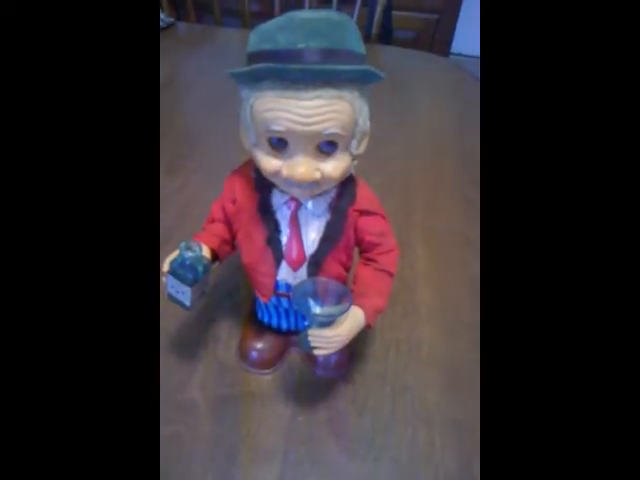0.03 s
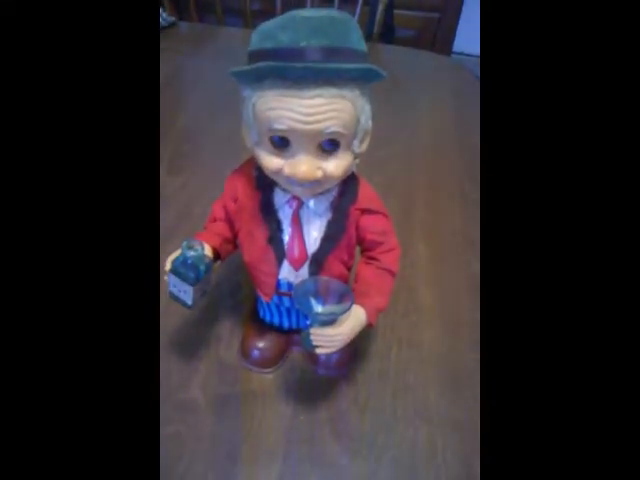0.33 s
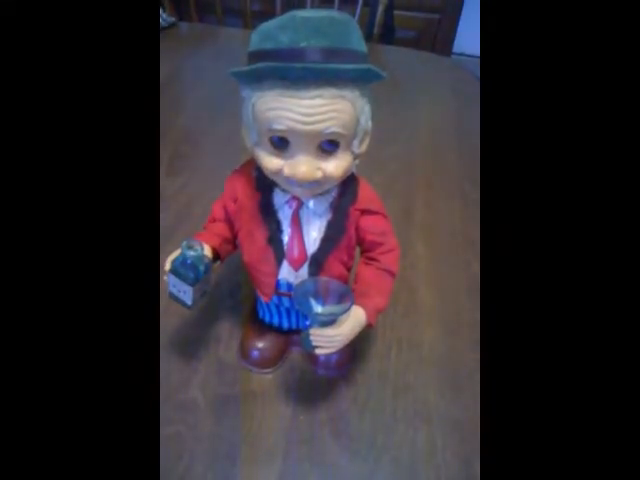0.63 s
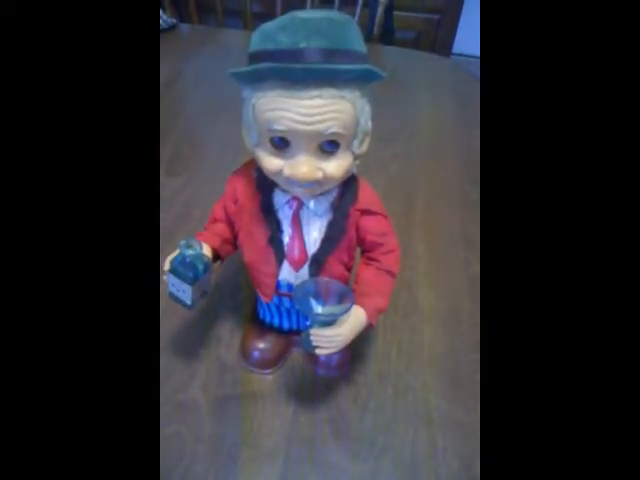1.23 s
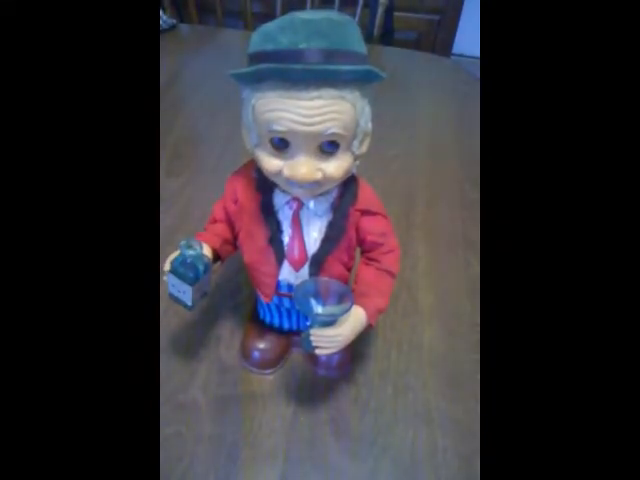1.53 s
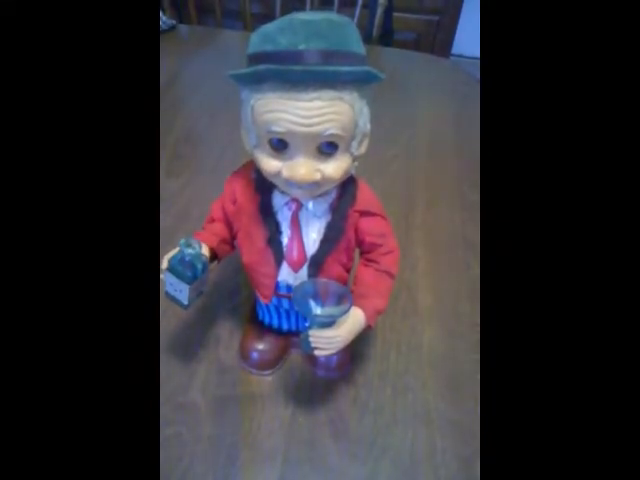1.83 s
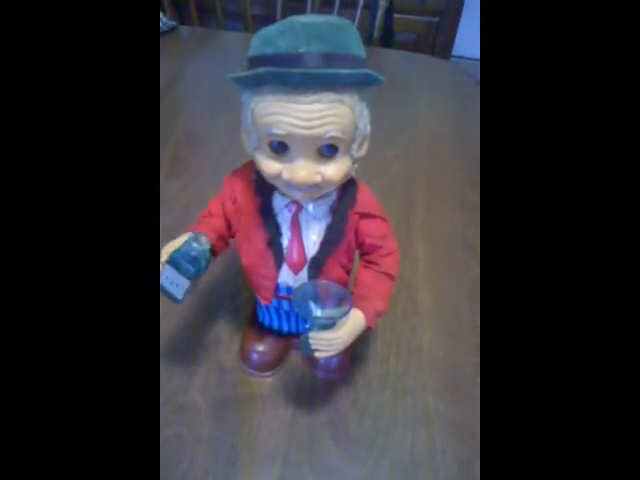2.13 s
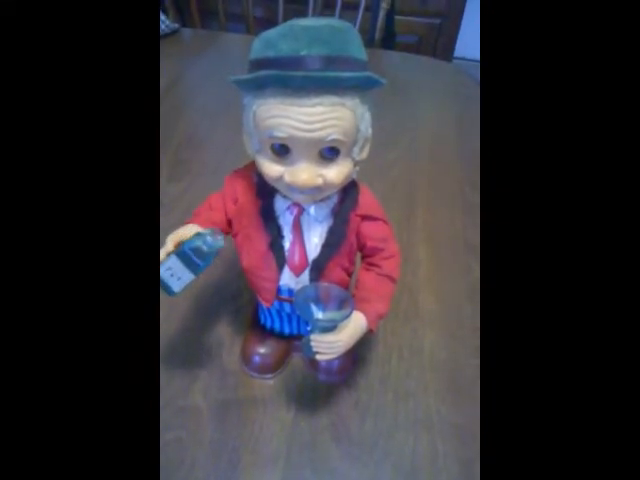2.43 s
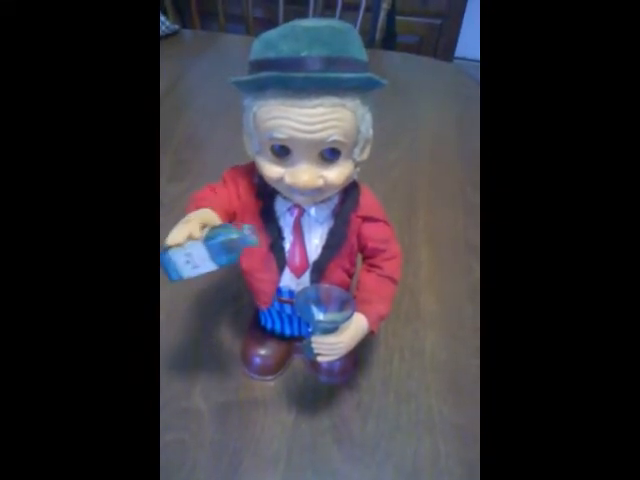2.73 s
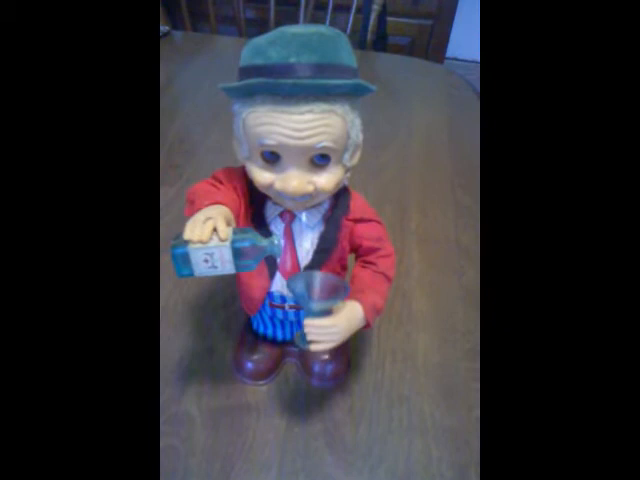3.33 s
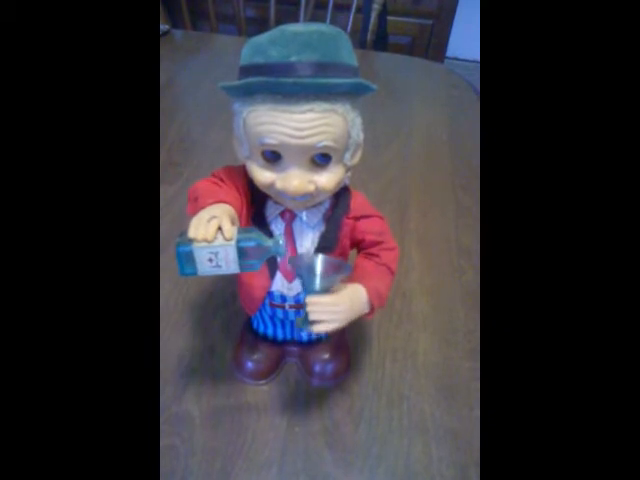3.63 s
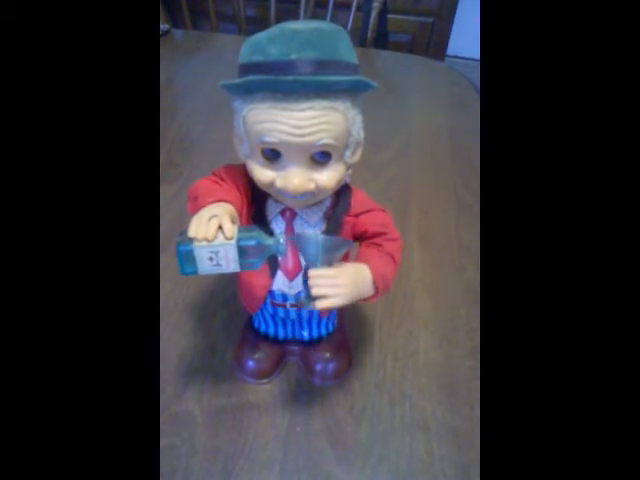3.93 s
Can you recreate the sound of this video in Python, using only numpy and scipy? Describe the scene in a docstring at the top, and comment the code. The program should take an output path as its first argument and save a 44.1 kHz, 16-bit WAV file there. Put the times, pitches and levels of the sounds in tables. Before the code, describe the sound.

A battery toy's gears whir and chatter steadily over a small droning motor.

```python
"""The gears of a battery toy figure whir and chatter as it lifts a bottle and a glass on a wooden table.
Loose teeth mesh unevenly and ring its hollow body, churned by an oval wheel and catching now and then.
Dry shafts rasp and motor brushes hiss on top; the motor drones and the table rumbles underneath.
A small room adds a short tail, and a close pair of microphone ports gives the stereo image."""
import sys
import numpy as np
from scipy import signal
from scipy.fft import rfft, irfft, next_fast_len
from scipy.io import wavfile
from scipy.ndimage import map_coordinates

SR = 44100
rng = np.random.default_rng(int(sys.argv[2]) if len(sys.argv) > 2 else 0)


def dump(signal):
    """Clip the signal to [-1, 1] and save it as 16-bit WAV at the path in sys.argv[1]."""
    limited = np.clip(np.atleast_2d(signal).T, -1, 1)
    pcm = np.round(limited * 32767).astype(np.int16)
    wavfile.write(sys.argv[1], SR, pcm)


N = 176400

# fader of the gear train as its load changes: time_s, level_db
GEAR_FADER = [(0.0, -40), (0.35, -40), (0.46, -41.5), (0.79, -38), (1.0, -38.5), (1.19, -39.5), (1.27, -38),
              (1.37, -36.5), (1.45, -35), (1.53, -34), (1.58, -40), (1.63, -37), (1.82, -36.5),
              (2.06, -33.5), (2.12, -36), (2.19, -33.5), (2.4, -36.5), (2.56, -35), (2.64, -35.5),
              (2.92, -33), (3.07, -36.5), (3.25, -34.5), (3.38, -36), (3.45, -34.5), (3.62, -35),
              (3.81, -35.5), (4.0, -32)]
# resonances of the hollow body: pitch_hz, width_hz, gain_db
BODY_MODES = [(551, 18.4, -7.5), (624, 11, -7), (804, 47, -2.5), (869.6, 51, -1.5), (958, 66, -3),
              (1117.3, 38.6, 1.5), (1171.6, 38, 1), (1401, 49, -6), (1506, 65, -2.5), (1577, 63, -4),
              (1764, 223, -10.5)]
# chatter within the gear noise: time_s, level_db
CHATTER_FADER = [(0, -4.5), (1, -2), (2.5, -5), (4, -8)]
# colour of the chatter between the resonances: freq_hz, gain_db
CHATTER_EQ = [(100, -29), (400, -23), (550, -10), (700, -6.5), (850, 1.5), (1040, -12), (1220, 2),
              (1320, 3), (1600, 1), (1900, -4.5), (2100, -9), (2600, -17), (4000, -61)]
# the wheel's churn, strong while the gears run free, weaker once the arms load them: time_s, depth_db
CHURN_DEPTH = [(0, .9), (1, .9), (1.3, .6), (4, .6)]
# the teeth catch and grind for a moment: peak_s, boost_db
TOOTH_CATCHES = [(.125, 0.5), (.282, 3), (.339, 1.5), (0.407, 3), (.536, 1), (.601, 5), (.656, 2.5),
                 (.717, 1), (.782, 3), (.847, 1), (.904, 3.5), (.964, 3.5), (1.036, 0.5), (1.247, 3.5),
                 (1.405, 2.5), (1.466, 1.5), (1.53, 1), (1.619, 3.5), (1.745, 1.5), (1.784, 2.5),
                 (2.051, 3.5), (2.203, 1.5), (2.303, 2), (2.443, 3.5), (2.518, 4.5), (2.586, 4),
                 (2.876, 1.5), (2.955, 3), (2.978, 2.5), (3.293, 4.5), (3.334, 3.5), (3.429, 3), (3.507, 2),
                 (3.569, 1.5), (3.855, 4.5)]
# fader of the treble rasp, shafts and brushes together: time_s, level_db
RASP_FADER = [(0.0, -42), (0.22, -39.5), (0.48, -42), (0.6, -38), (0.67, -39), (0.78, -38), (0.8, -42),
              (0.83, -37.5), (0.86, -40.5), (0.91, -37.5), (1.05, -39), (1.53, -36), (1.55, -40.5),
              (1.78, -36), (1.9, -37.5), (2.05, -35), (2.14, -38), (2.27, -36), (2.35, -39), (2.37, -36.5),
              (2.5, -36), (2.53, -38.5), (2.82, -38), (2.97, -35), (3.03, -40), (3.14, -36.5), (3.16, -39),
              (3.31, -38), (3.38, -39.5), (3.41, -37.5), (3.77, -36.5), (3.79, -38), (3.85, -36.5),
              (3.89, -38.5), (4.0, -34)]
# resonances of the gearbox: pitch_hz, width_hz, gain_db
GEARBOX_MODES = [(2082, 23, -9.5), (2160, 25, -3), (2304, 34, 1), (2414, 75, 0), (2623, 104, 2.5),
                 (3868, 300, -2.5), (4090, 100, 1.5), (4234, 79, 0.5), (4390, 67, -3), (4590, 130, 0),
                 (4794, 115, -0.5), (5050, 150, -1), (5460, 460, -1), (6040, 380, -3.5), (7950, 1010, -7),
                 (13370, 790, -11)]
# brush hiss within the rasp: time_s, level_db
HISS_FADER = [(0, -2), (2.3, -1.5), (3.1, -0.5), (4, -3)]
# colour of the brush hiss: freq_hz, gain_db
HISS_EQ = [(1200, -16), (2400, 1), (3300, 8), (5500, -10.5), (6500, 2), (7500, 5), (8600, -2), (10000, -2),
           (11500, -3.5), (12500, -1), (14000, 2)]
# fader of the body's low drone: time_s, level_db
DRONE_FADER = [(0, -48.5), (.45, -51.5), (1.2, -48), (2, -46.5), (3, -46), (4, -43)]
# colour of the drone: freq_hz, gain_db
DRONE_EQ = [(100, -41), (190, -7), (250, -7.5), (300, -3.5), (410, -1.5), (490, 6.5), (620, 0.5), (900, 3),
            (2000, -46)]
# faint motor tones, relative to the drone's noise: pitch_hz, level_db
MOTOR_TONES = [(356, -17), (556, -10), (623, -10)]
# colour of the table's rumble: freq_hz, gain_db
RUMBLE_EQ = [(25, -27), (50, -14), (75, -27), (100, -4.5), (135, -3.5), (185, -0.5), (260, -2), (400, -24)]
# how alike the two ports sound: freq_hz, likeness (0 to 1)
PORT_LIKENESS = [(60, .9), (120, .6), (180, .05), (300, .4), (550, .75), (850, .92), (1030, .8),
                 (1150, .96), (1700, .99), (2150, .45), (2450, .72), (2880, 1), (3150, 1), (3400, .8),
                 (3700, .25), (4400, .93), (5200, .6), (5650, .5), (6050, .1), (7300, .85), (8050, .2),
                 (8400, .35), (8900, .05), (10300, .87), (11800, .05), (13200, .85), (14000, .2)]
# phase by which the left port leads the right: freq_hz, lead_rad
PORT_LEAD = [(20, 3.14), (150, 3.14), (210, 0), (1500, 0), (1850, -.15), (2200, -1.1), (2430, -3.14),
             (3400, -3.14), (3800, -4.5), (4400, -6.28), (5200, -7), (5750, -9.2), (6100, -10),
             (6450, -12.3), (7300, -12.57), (14000, -12.57)]

MESH_HZ, MESH_WANDER, TOOTH_PLAY_S = 288.7, 0.01821, 0.00018
WHEEL_HZ, WHEEL_WANDER = 16.05, 0.012
CATCH_RISE_S, CATCH_FALL_S = 0.011, 0.012
RATTLES_PER_S, SCRAPES_PER_S = 1900, 6000
MESH_DB, RATTLE_DB, SCRAPE_DB, DRONE_DB, RUMBLE_DB, ROOM_DB = -5, -3, 2, -2, -60.5, -13  # layer trims
# lifting the glass loads the gearbox and damps its upper resonances
GLASS_LIFT_S, LIFT_RAMP_S, LIFT_DAMP_DB, DAMP_ABOVE_HZ = 3.0, .3, -2.2, 4400


def gears(press_db):
    """Meshing teeth and loose rattles ring the hollow body; chatter fills in between the resonances."""
    mesh = amp(MESH_DB) * ring(teeth(spread_db=4.0), BODY_MODES)
    rattle = amp(RATTLE_DB) * ring(impacts(RATTLES_PER_S, spread_db=2.5), BODY_MODES)
    chatter = amp(curve(CHATTER_FADER)) * coloured(impacts(RATTLES_PER_S, spread_db=2.5), CHATTER_EQ)
    return amp(curve(GEAR_FADER) + press_db) * (mesh + rattle + chatter)


def teeth(spread_db):
    """Two streams of one knock per gear tooth, each a little early or late and of its own strength."""
    teeth_passed = np.floor(turns(MESH_HZ, MESH_WANDER, rate=45))
    due = np.flatnonzero(np.diff(teeth_passed))
    streams = []
    for late, strength in rng.standard_normal((2, 2, 4096))[..., :len(due)]:
        onsets = np.clip(due + late * TOOTH_PLAY_S * SR, 0, N - 1).astype(int)
        streams.append(np.bincount(onsets, amp(spread_db * strength), N))
    return np.array(streams)


def tooth_pressure(shudder_db=.55):
    """Level swing in dB: an oval wheel presses twice a turn, catches swell, and the teeth shudder."""
    t = np.arange(N) / SR
    churn = curve(CHURN_DEPTH) * np.cos(4 * np.pi * turns(WHEEL_HZ, WHEEL_WANDER, rate=7.1))
    catches = np.zeros(N)
    for peak_s, boost_db in TOOTH_CATCHES:
        width_s = np.where(t < peak_s, CATCH_RISE_S, CATCH_FALL_S)
        catches += boost_db * np.exp(-np.minimum(((t - peak_s) / width_s) ** 2, 20))
    return churn + catches + shudder_db * wobble(rate=37)


def shaft_scrape(press_db, follow=0.67, flutter_db=1.9):
    """Dry shafts scrape in the gearbox, each resonance fluttering on its own."""
    contacts = impacts(SCRAPES_PER_S, spread_db=2.0)
    lift = np.clip((np.arange(N) / SR - GLASS_LIFT_S) / LIFT_RAMP_S, 0, 1)
    scrape = np.zeros((2, N))
    for k, (hz, width_hz, gain_db) in enumerate(GEARBOX_MODES):
        ringing = signal.lfilter(*signal.iirpeak(hz, hz / width_hz, SR), contacts)
        damp_db = LIFT_DAMP_DB * lift * (hz > DAMP_ABOVE_HZ)
        scrape += (-1) ** k * amp(gain_db + damp_db + flutter_db * wobble(rate=45)) * ringing
    return amp(SCRAPE_DB + follow * press_db) * unit(scrape)


def brush_hiss(press_db, follow=0.076, flutter_db=1.47):
    """The motor brushes make tiny contacts so dense that they blur into a fluttering hiss."""
    flutter = amp(flutter_db * wobble(rate=60))
    hiss = coloured(impacts(per_s=18000, spread_db=3), HISS_EQ)
    return amp(curve(HISS_FADER) + follow * press_db) * flutter * hiss


def motor_drone(press_db, follow=0.41):
    """The motor shakes the body: low noise, with a few unsteady tones in the shared stream."""
    drone = coloured(rng.standard_normal((2, N)), DRONE_EQ)
    for hz, level_db in MOTOR_TONES:
        drone[0] += amp(level_db) * np.sqrt(2) * np.sin(2 * np.pi * turns(hz, wander=0.01143, rate=23))
    return amp(curve(DRONE_FADER) + DRONE_DB + follow * press_db) * drone


def table_rumble(follow=0.48, bump_db=1.5):
    """The table top rumbles unevenly under the toy, partly riding the drone's fader."""
    bumps = amp(bump_db * wobble(rate=16))
    rumble = unit(bumps * coloured(rng.standard_normal((2, N)), RUMBLE_EQ))
    load_db = curve(DRONE_FADER)
    return amp(RUMBLE_DB + follow * (load_db - load_db.mean())) * rumble


def room(x, t60_s=0.15, renew_s=.25):
    """A short, smooth room tail, renewed every quarter second so it adds no fixed colour."""
    t, step = np.arange(SR // 3) / SR, int(renew_s * SR)
    wet = np.zeros_like(x)
    for centre in range(0, N + step, step):
        fade = np.sqrt(np.clip(1 - abs(np.arange(N) - centre) / step, 0, 1))
        tail = rng.standard_normal((2, len(t))) * amp(-60 * t / t60_s)
        wet += signal.fftconvolve(x * fade, tail / np.linalg.norm(tail[0]), axes=1)[:, :N]
    return wet


def ports(x):
    """Spread a shared (mid) and an unshared (side) stream over two ports, with their likeness and lag."""
    def mid_side_gains(f):
        angle = np.arccos(np.clip(along(PORT_LIKENESS, f), 0, 1)) / 2
        return np.array([np.cos(angle), np.sin(angle)])
    mid, side = filtered(x, mid_side_gains)
    stereo = np.array([mid + side, mid - side])
    return filtered(stereo, lambda f: np.exp(.5j * np.outer([1, -1], along(PORT_LEAD, f))))


def impacts(per_s, spread_db):
    """Two unrelated streams of tiny random contacts."""
    hit = rng.random((2, N)) < per_s / SR
    polarity = np.sign(rng.standard_normal((2, N)))
    return hit * polarity * amp(spread_db * rng.standard_normal((2, N)))


def ring(x, modes):
    """x through a bank of resonances of alternating polarity, at rms 1."""
    def response(f):
        return sum((-1) ** k * amp(db) * 1j * f * width / (hz * hz - f * f + 1j * f * width)
                   for k, (hz, width, db) in enumerate(modes))
    return unit(filtered(x, response))


def coloured(x, eq):
    """x through a broad EQ curve, at rms 1."""
    return unit(filtered(x, lambda f: amp(along(eq, f))))


def filtered(x, response):
    """x through a complex frequency response."""
    size = next_fast_len(N + SR // 2)
    return irfft(rfft(x, size) * response(np.fft.rfftfreq(size, 1 / SR)), size)[..., :N]


def turns(hz, wander, rate):
    """Cycles run up by a part whose speed wanders."""
    return np.cumsum(hz * (1 + wander * wobble(rate))) / SR


def wobble(rate):
    """A smooth random curve, rate knots a second."""
    return map_coordinates(rng.standard_normal(2048), [np.arange(N) * rate / SR], mode="wrap")


def curve(rows):
    """Automation from time_s, value rows, one value per sample."""
    return np.interp(np.arange(N) / SR, *np.transpose(rows))


def along(rows, hz):
    """Read freq_hz, value rows on a log frequency axis."""
    freqs, values = np.transpose(rows)
    return np.interp(np.log(hz + 1), np.log(freqs + 1), values)


def amp(db):
    """Decibels to gain."""
    return 10 ** (np.asarray(db) / 20)


def unit(x):
    """Scale to rms 1."""
    return x / np.sqrt(np.mean(x ** 2) + 1e-20)


def scene():
    """The mix: one tooth pressure drives the gears; shafts, brushes and motor each follow a share of it."""
    press_db = tooth_pressure()
    toy = gears(press_db)
    toy += amp(curve(RASP_FADER)) * (shaft_scrape(press_db) + brush_hiss(press_db))
    toy += motor_drone(press_db) + table_rumble()
    return ports(toy + amp(ROOM_DB) * room(toy))


def record(dry):
    """A brick-wall high cut at 14 kHz."""
    return filtered(dry, lambda f: f < 14000)


dry = scene()
out = record(dry)
dump(out)
```